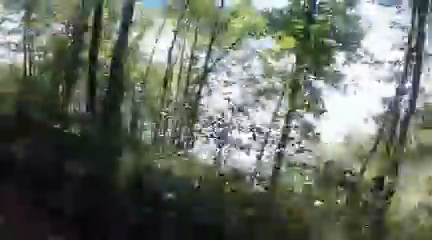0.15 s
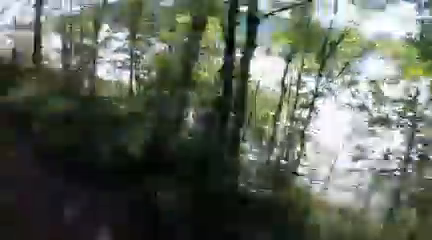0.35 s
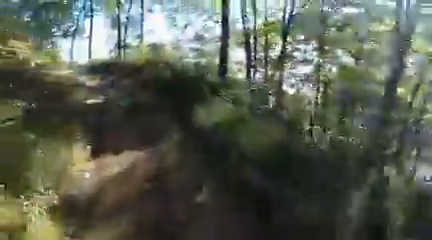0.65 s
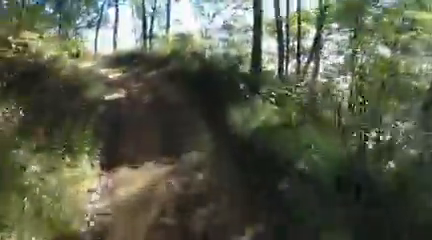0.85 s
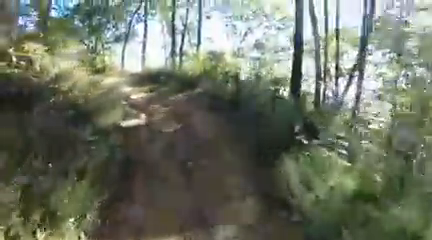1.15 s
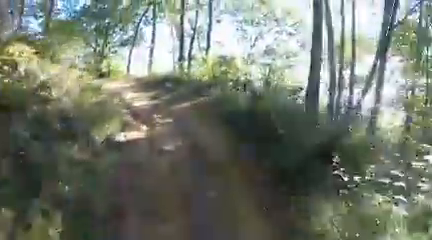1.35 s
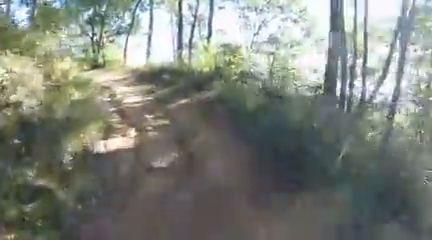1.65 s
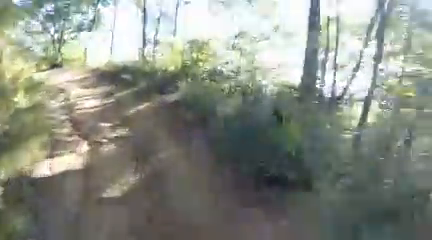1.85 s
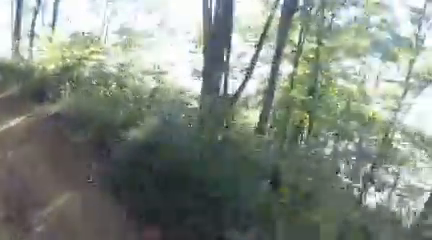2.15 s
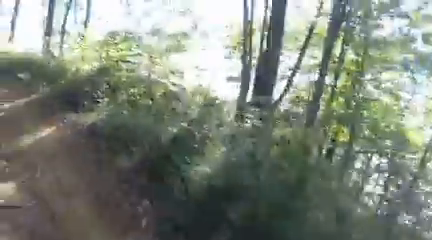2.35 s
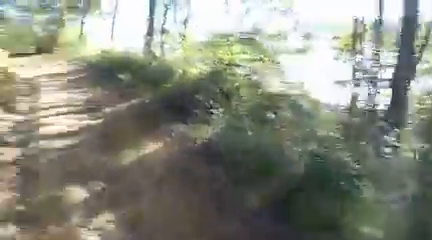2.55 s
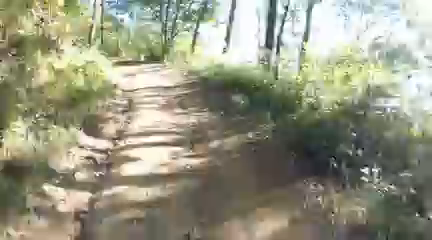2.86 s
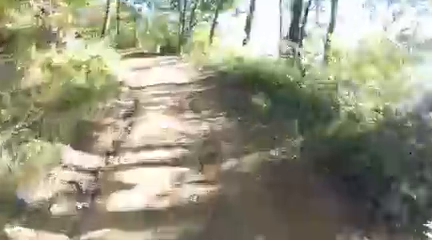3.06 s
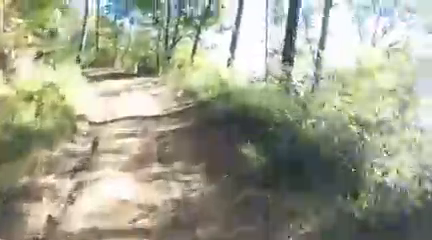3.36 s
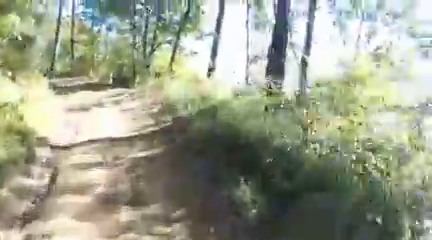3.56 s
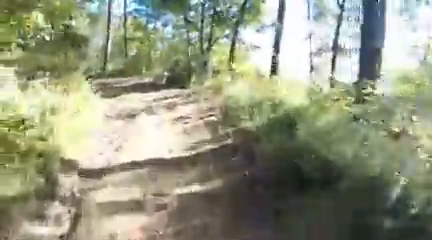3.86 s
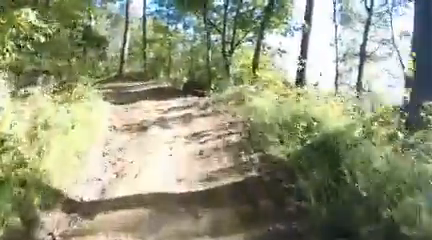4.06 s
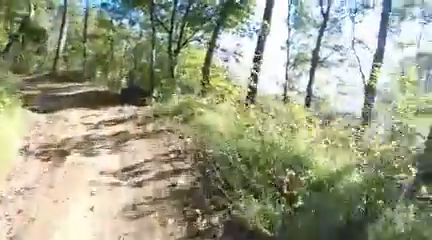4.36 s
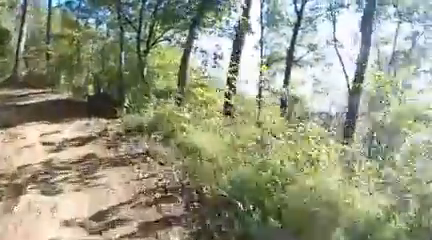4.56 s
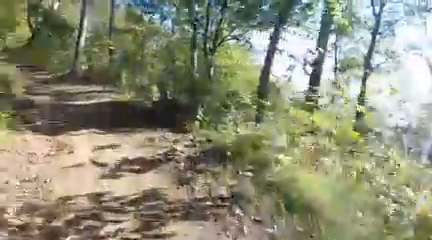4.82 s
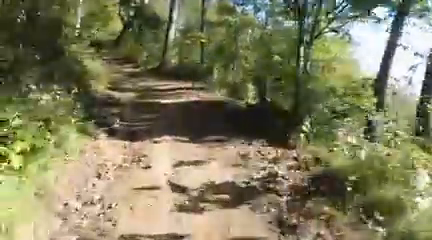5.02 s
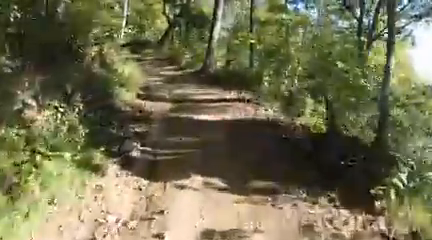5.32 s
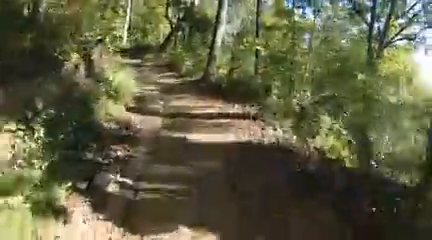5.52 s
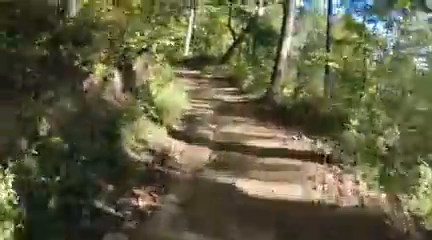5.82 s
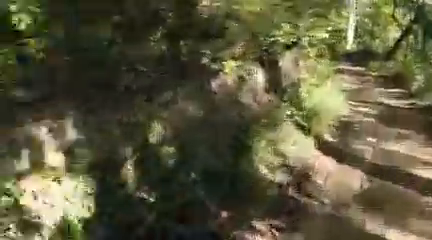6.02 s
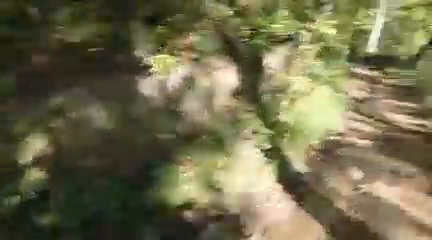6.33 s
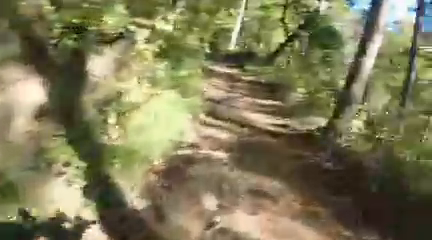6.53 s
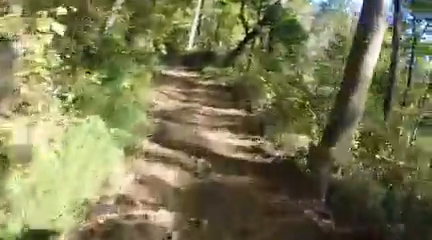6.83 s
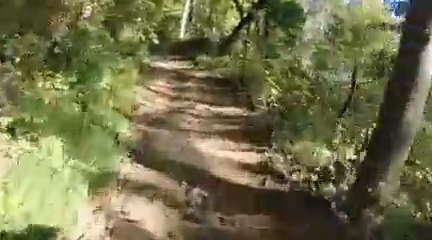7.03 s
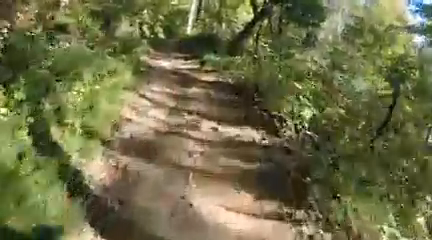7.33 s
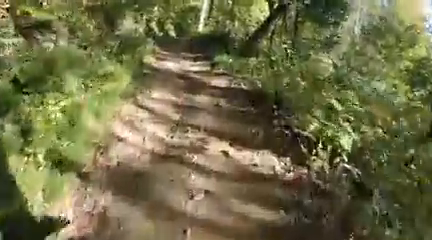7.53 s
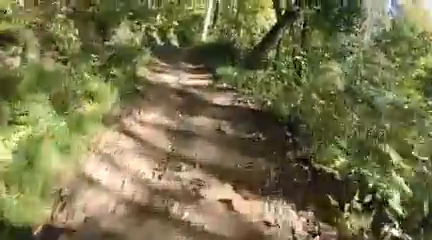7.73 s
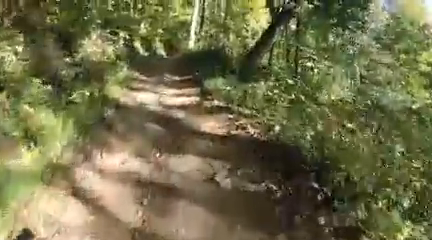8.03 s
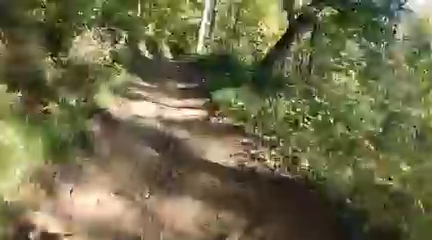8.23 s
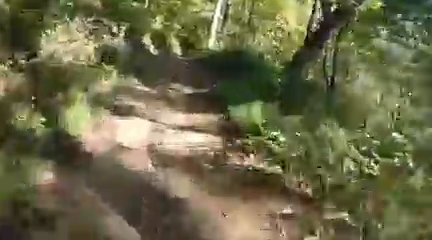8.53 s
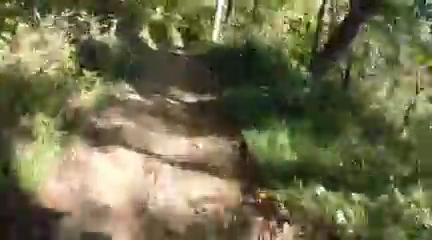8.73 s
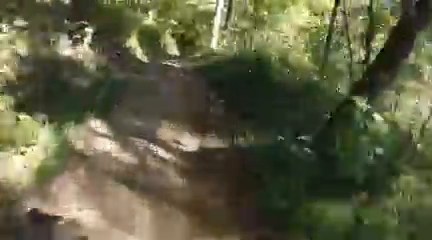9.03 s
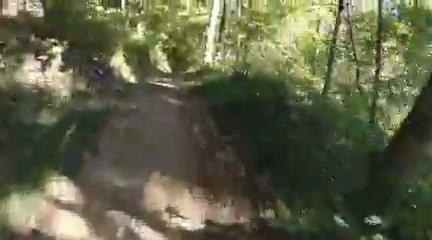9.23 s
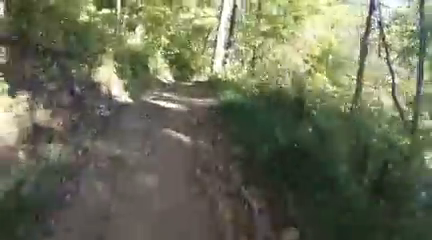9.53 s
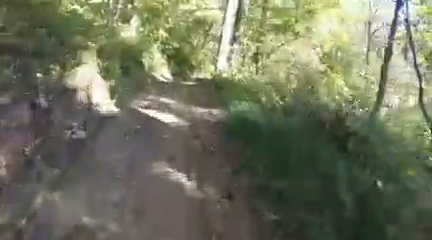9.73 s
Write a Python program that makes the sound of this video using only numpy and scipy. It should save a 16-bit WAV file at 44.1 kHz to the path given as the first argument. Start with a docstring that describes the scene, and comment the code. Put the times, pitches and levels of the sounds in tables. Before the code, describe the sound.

Heard close from the rider's seat outdoors, a single-cylinder four-stroke engine chugs at low, wavering revs with metallic rattle, chain rustle and soft hiss. A dull bump thuds at the start. The revs gradually climb, dip briefly around seven seconds, then two loud throttle bursts bring a honking intake roar and sharp knocking.

```python
"""A single-cylinder four-stroke off-roader chugs up a dirt forest trail, heard from the rider's seat.
Each engine cycle shakes the frame, clicks into resonances of silencer and pipe, and sets off cases,
valve and covers as noise through resonances. Chain and gas rustle and hiss; air and trail rumble below.
A bump thuds at the start; near the end two bursts of throttle make the airbox honk and the cylinder knock."""
import sys
import numpy as np
from scipy import signal
from scipy.fft import rfft, irfft, next_fast_len
from scipy.io import wavfile
from scipy.ndimage import uniform_filter1d

SR = 44100
rng = np.random.default_rng(int(sys.argv[2]) if len(sys.argv) > 2 else 0)


def persist_wave(psi):
    """Save psi, clipped to +-1, as 16-bit WAV."""
    counts = np.round(np.clip(psi, -1, 1) * 32767).astype(np.int16)
    wavfile.write(sys.argv[1], SR, np.atleast_2d(counts).T)


N = 435708
TIME_S = np.arange(N) / SR
CRUISE_PER_S = 22  # firings per s = engine cycles per s


def from_db(db):
    """Decibels to gain."""
    return 10 ** (np.asarray(db) / 20)


def in_time(rows):
    """Interpolate each column of a curve at every sample; the first column is time."""
    s, *columns = np.transpose(rows)
    return [np.interp(TIME_S, s, column) for column in columns]


def rms_one(x):
    """Scale to unit power."""
    return x / np.sqrt(np.mean(x ** 2) + 1e-20)


def steady(x):
    """Level to unit power over every few engine cycles."""
    power = uniform_filter1d(x ** 2, size=4400)
    power = uniform_filter1d(power, size=4400)
    return x / np.sqrt(np.abs(power) + 1e-14)


def cut(x, hz, kind, order=2):
    """Butterworth filter."""
    sos = signal.butter(order, hz, kind, fs=SR, output="sos")
    return signal.sosfilt(sos, x + 1e-18)


def colour(x, spectrum):
    """Give a noise a smooth spectrum, at unit power."""
    hz, db = np.transpose(spectrum)
    size = next_fast_len(N)
    bins_hz = np.maximum(np.fft.rfftfreq(size, 1 / SR), 1)
    gain = from_db(np.interp(np.log(bins_hz), np.log(hz), db))
    return rms_one(irfft(rfft(x, size) * gain, size)[:N])


def ring(x, modes, driven=False):
    """Parallel modes; level_db is the ring height after a click, or the resonance peak if driven."""
    out = np.zeros(N)
    for pitch_hz, width_hz, level_db in modes:
        r = np.exp(-np.pi * abs(width_hz) / SR)
        w = 2 * np.pi * pitch_hz / SR
        b = np.array([1, 0, -1]) * (1 - r * r) / 2 if driven else [0, np.sin(w)]
        out += from_db(level_db) * signal.lfilter(b, [1, -2 * r * np.cos(w), r * r], x + 1e-18)
    return out


def clicks(times_s, db):
    """One single-sample click at each time."""
    out = np.zeros(N)
    out[np.clip(np.asarray(times_s) * SR, 0, N - 1).astype(int)] = from_db(db)
    return out


def strokes(cycle, share, jitter, spread_db):
    """One slightly uneven click per engine cycle, at a given share of it."""
    turns = np.arange(int(cycle[-1] - share) + 1)
    chance = rng.standard_normal((len(turns), 2))
    times_s = np.interp(turns + share + jitter * chance[:, 0], cycle, TIME_S)
    return clicks(times_s, spread_db * chance[:, 1])


def puff(hits, decay_s):
    """A burst of turbulence of unit energy dying after each click."""
    r = np.exp(-1 / (decay_s * SR))
    envelope = signal.lfilter([np.sqrt(1 - r * r)], [1, -r], hits + 1e-18)
    return envelope * rng.standard_normal(N)


def rattling(cycle, pattern, grain_db):
    """Countless small contacts of uneven size, bunched at certain crank angles."""
    share, db = np.transpose(pattern)
    sizes = np.repeat(rng.standard_normal(N // 32 + 1), 32)[:N]
    level_db = np.interp(cycle, share, db, period=1) + grain_db * sizes
    return rng.standard_normal(N) * from_db(level_db)


# silencer modes: pitch_hz, width_hz, level_db
SILENCER_MODES = [(144, 27, 4.5), (187.5, 13.2, -3), (237, 47.6, 7), (270, 23, -8)]
# pipe modes at low revs: pitch_hz, width_hz, level_db
PIPE_MODES = [(425, 19, -6), (455, 38, 2.5), (568, 66, -4.5), (574, 65, -21)]
# pipe modes under a hard-driven gas flow: pitch_hz, width_hz, level_db
PIPE_DRIVEN_MODES = [(410, 21, 7), (465, 76, 10), (597, 19, -14)]


def exhaust(cycle, speed):
    """The power stroke thumps, then the exhaust valve lets go a sharper puff; returns boom and bark."""
    revving = np.clip((speed - 23.5) / 5, 0, 1)
    thump = strokes(cycle, share=.645, jitter=.0015, spread_db=.9)
    # blowdown comes earlier at high revs
    blowdown = strokes(cycle + .065 * revving, share=.9, jitter=.0011, spread_db=.8)
    gas = .07 * (1 - .5 * revving) * puff(thump + blowdown, decay_s=.006)
    boom = ring(thump + .29 * blowdown + gas, SILENCER_MODES)
    boom = cut(cut(boom, 182, "high"), 310.5, "low", order=8)
    putter = ring(.47 * thump - blowdown + gas, PIPE_MODES)
    putter = steady(cut(putter, 430, "high", order=6))
    blat = ring(.21 * thump - blowdown + gas, PIPE_DRIVEN_MODES)
    blat = steady(cut(blat, 440, "high", order=6))
    bark = cut((1 - revving) * putter + revving * blat, 616, "low", order=6)
    return steady(boom), steady(bark)


# airbox modes: pitch_hz, width_hz, level_db
AIRBOX_MODES = [(198, 17, -2), (237.6, 19.7, -1), (261.2, 17, 2), (291.4, 16.3, -2.5)]


def intake(cycle):
    """Each gulp of air tugs at the inlet and rings the airbox; the narrow inlet flattens peaks to a roar."""
    gulp = strokes(cycle, share=.9, jitter=.001, spread_db=.4)
    honk = ring(gulp + .02 * puff(gulp, decay_s=.008), AIRBOX_MODES)
    honk = steady(cut(honk, 178, "high", order=4))
    roar = np.tanh(1.1 * honk)
    roar = steady(cut(cut(roar, 182, "high", order=6), 303, "low", order=10))
    suction = ring(gulp, [(95, 71, 0)], driven=True)
    suction = steady(cut(suction, 135, "low", order=4))
    return roar + from_db(-17.5) * suction


# low shake, before a fixed trim: time_s, level_db
SHAKE_CURVE = [(0.0, -34.5), (1.7, -31.5), (3.93, -36.5), (5.03, -31.5), (5.06, -33.5), (6.96, -35.5),
               (7.24, -27), (7.37, -37.5), (7.92, -31.5), (8.06, -43.5), (8.17, -32), (8.97, -37),
               (9.38, -28), (9.88, -31)]


def crank(cycle):
    """The piston shakes the machine once per turn, twice per cycle."""
    shake_db = in_time(SHAKE_CURVE)[0]
    return from_db(shake_db - 1.1) * np.sqrt(2) * np.cos(4 * np.pi * (cycle - .23))


# stray knocks, click into the cylinder: time_s, level_db
STRAY_KNOCKS = [(3.8149, -28.5), (7.363, -37), (8.389, -25), (8.8273, -30)]
# sudden load, every firing knocks; click level at full effort: start_s, end_s, level_db
LOAD_SPELLS = [(8.135, 8.335, -15.5), (9.21, 9.425, -20.5)]
# cylinder struck by a knock: pitch_hz, width_hz, level_db
CYLINDER_MODES = [(866, 100, -5), (1464, 88, 6), (1660, 470, -1), (1850, 240, -8), (2700, 260, -11.5),
                  (5500, 1200, -6)]
# engine cases and fins: pitch_hz, width_hz, level_db
CASE_MODES = [(1470, 230, 3), (1506, 320, -2.5), (2315, 210, 8.5), (2460, 230, -4.5), (2650, 120, 5.5),
              (3183, 51, 2), (4380, 27, -10.5), (5070, 116, -27)]
FULL_EFFORT_DB = -17
ADVANCE_CYCLE_PER_SPEED = .007  # share of a cycle per extra firing per s


def knocks(cycle, speed, clatter_db, effort_db):
    """Combustion pings the cylinder lightly each firing, hard under sudden load; the fins buzz after it."""
    s, db = np.transpose(STRAY_KNOCKS)
    loaded = np.zeros(N)
    for start_s, end_s, level_db in LOAD_SPELLS:
        loaded += from_db(level_db) * ((TIME_S > start_s) & (TIME_S < end_s))
    advanced = cycle + ADVANCE_CYCLE_PER_SPEED * (speed - CRUISE_PER_S)
    firings = strokes(advanced, share=.705, jitter=.003, spread_db=.7)
    hard = clicks(s, db) + loaded * from_db(effort_db - FULL_EFFORT_DB) * firings
    light = from_db(clatter_db - 9) * strokes(cycle, share=.73, jitter=.014, spread_db=5)
    hits = hard + light
    pings = ring(hits + .2 * puff(hits, decay_s=.0023), CYLINDER_MODES)
    fins = from_db(-15) * ring(puff(hard, decay_s=.0047), CASE_MODES)
    return cut(cut(pings + fins, 880, "high"), 7000, "low", order=3)


# rattle over the engine cycle: cycle_share, level_db
CLATTER_PATTERN = [(0, .8), (.12, -2), (.42, -2.6), (.5, .3), (.66, -.8), (.73, 2.6), (.86, .6), (.94, 2.4)]
# hiss over the engine cycle: cycle_share, level_db
HISS_PATTERN = [(0, 6), (.15, 3), (.42, 3.3), (.46, 3.5), (.66, 5.5), (.72, 6.5), (.9, 1.4)]
# broad rustle of chain, gears and tyres: pitch_hz, density_db_per_hz (relative)
RUSTLE_SPECTRUM = [(200, -29), (350, -6), (430, 2), (620, 1), (800, -8), (1000, -4.5), (1300, 4),
                   (2000, -0.5), (3000, -4), (3800, -14), (6000, -31), (12000, -74)]
# hiss of chain and gas: pitch_hz, density_db_per_hz (relative)
HISS_SPECTRUM = [(1800, -30), (3000, -3), (4000, -2.5), (4450, 1), (4900, -5), (5500, -2), (6150, -3),
                 (7000, -13), (8050, -21.5), (8700, -18), (9600, -18), (12000, -26), (14800, -33),
                 (17000, -60)]
# stones flung against the guard, relative level: time_s, level_db
STONE_TICKS = [(0.9846, -31), (7.041, -30)]


def mechanics(cycle, clatter_db, hiss_db):
    """Valve gear and piston rattle the cases, flung stones tick on the guard; chain and gas rustle and hiss."""
    cases = rms_one(ring(rattling(cycle, CLATTER_PATTERN, grain_db=-.5), CASE_MODES, driven=True))
    rustle = colour(rattling(cycle, CLATTER_PATTERN, grain_db=1.5), RUSTLE_SPECTRUM)
    hiss = colour(rattling(cycle, HISS_PATTERN, grain_db=1.5), HISS_SPECTRUM)
    s, db = np.transpose(STONE_TICKS)
    ticks = from_db(17) * ring(puff(clicks(s, db), decay_s=.0043), CASE_MODES, driven=True)
    metal = cut(from_db(clatter_db - 3) * cases + ticks, 7070, "low", order=4)
    return metal + from_db(clatter_db + 1) * rustle + from_db(hiss_db + .15) * hiss


# cylinder head under a seating valve: pitch_hz, width_hz, level_db
HEAD_MODES = [(2330, 250, 0), (2690, 350, -6), (3260, 580, 3), (4430, 78, 6), (5660, 100, -1)]


def valves(cycle, speed, hiss_db):
    """The inlet valve snaps shut once a cycle with a short rasp, a little earlier at higher revs."""
    advanced = cycle + .016 * (speed - CRUISE_PER_S)
    snaps = strokes(advanced, share=.45, jitter=.0085, spread_db=8)
    rasp = ring(puff(snaps, decay_s=.0067), HEAD_MODES, driven=True)
    rasp = cut(rasp, [1700, 6200], "band", order=3)
    return from_db(hiss_db - 3) * steady(rasp)


# buzzing covers and guards: pitch_hz, width_hz, cruise_level_db, rise_db_per_firing_per_s,
# critical_firings_per_s, critical_change_db
COVER_MODES = [(880, 146, -65.5, 2, 18.5, 16), (1168.5, 26, -49.5, 1.1, 23.96, -15.5),
               (1458, 84, -53.5, 1.4, 24.2, 4), (1854, 57, -59.5, 0.74, 25.6, 9.5),
               (2273, 94, -55, 0.74, 21.6, 3.5), (3270, 150, -66.5, .5, 25, 11.5)]
CRITICAL_WIDTH_PER_S = 2.44


def covers(cycle, speed):
    """Thin covers buzz at their own pitch as the engine shakes them, swelling or calming near one speed."""
    shaking = rattling(cycle, CLATTER_PATTERN, grain_db=1.5)
    held = uniform_filter1d(speed, size=13000)  # they answer to sustained revs, hardly to a blip
    out = np.zeros(N)
    for pitch_hz, width_hz, cruise_db, rise_db, critical_per_s, change_db in COVER_MODES:
        near = np.exp(-((held - critical_per_s) / CRITICAL_WIDTH_PER_S) ** 2)
        level_db = cruise_db + rise_db * (held - CRUISE_PER_S) + change_db * near
        buzz = steady(ring(shaking, [(pitch_hz, width_hz, 0)], driven=True))
        out += from_db(level_db) * buzz
    return cut(out, 3460, "low", order=3)


# bumps in the trail, relative level: time_s, level_db
TRAIL_BUMPS = [(0.093, -5.5), (0.132, -17.5), (0.215, -19), (0.234, -22)]
# bodywork struck by a bump: pitch_hz, width_hz, level_db
BODYWORK_MODES = [(114, 19, 1.5), (142, 20, -15), (202, 93, -38), (370, 71, -14)]
# drumming bodywork, before a fixed trim: time_s, level_db
DRUMMING_CURVE = [(0.3, -48), (0.35, -34.5), (0.56, -50), (0.64, -39.5), (0.94, -39.5), (0.97, -44),
                  (2.41, -41), (2.46, -48), (2.7, -39.5), (3.37, -47.5), (3.85, -39), (4.3, -44.5),
                  (8.17, -42), (8.22, -37), (8.97, -43), (9.4, -33.5), (9.67, -35), (9.88, -32)]
BUFFET_CRUISE_DB, BUFFET_RISE_DB = -38, .74  # rise per extra firing per s
JOLT_DB, JOLT_S = 9.5, .36  # air swells around the bumps


def ride(revs):
    """Air buffets the microphone; the rough ground drums the bodywork and bumps make it thud."""
    s, db = np.transpose(TRAIL_BUMPS)
    jolt_db = JOLT_DB * np.exp(-np.abs(TIME_S - s.mean()) / JOLT_S)
    air_spectrum = [(3, -7), (10, -3.5), (22, -4.5), (45, -17.5), (90, -23), (300, -26.5), (2000, -100)]
    air = colour(rng.standard_normal(N), air_spectrum)
    drumming = steady(ring(rng.standard_normal(N), [(101.5, 20, 0)]))
    thuds = cut(ring(-clicks(s, db), BODYWORK_MODES), [70, 480], "band")
    buffet = from_db(BUFFET_CRUISE_DB + BUFFET_RISE_DB * revs + jolt_db) * air
    drum = from_db(in_time(DRUMMING_CURVE)[0] + 1.5) * drumming
    return buffet + drum + from_db(-4) * thuds


COAST_DB_PER_S = 9


def coast(db):
    """Chain and tyres roll on as the throttle shuts: the level rises at once and sinks slowly."""
    return np.maximum.accumulate(db + COAST_DB_PER_S * TIME_S) - COAST_DB_PER_S * TIME_S


# engine speed: time_s, firings_per_s
SPEED_CURVE = [(0.0, 19.76), (1.29, 18.38), (1.53, 16.52), (1.83, 21.61), (2.02, 18.84), (2.31, 19.73),
               (2.58, 23.35), (2.82, 20.06), (3.27, 22.48), (3.7, 21.66), (3.86, 25.35), (4.14, 24.69),
               (4.2, 23.46), (4.92, 19.46), (5.57, 22.52), (5.88, 21.16), (6.41, 25.12), (6.6, 23.63),
               (6.93, 26.55), (7.11, 15.88), (7.23, 16.16), (7.48, 25.11), (7.8, 21.47), (8.15, 24.9),
               (8.25, 30.99), (8.5, 26.59), (8.82, 27.91), (8.98, 26.76), (9.17, 27.49), (9.26, 30.75),
               (9.37, 34.12), (9.88, 29.52)]
# how hard the engine works, sets its note before a fixed trim: time_s, effort_db
EFFORT_CURVE = [(0, -44.5), (1.0, -47.5), (1.6, -47), (1.82, -43), (2.2, -42), (2.55, -40.5), (2.85, -42),
                (3.3, -39.5), (3.65, -41.5), (3.87, -38), (4.85, -43), (5.5, -41), (5.85, -41), (6.9, -37),
                (7.06, -49), (7.27, -43), (7.43, -40), (7.75, -39), (8.125, -37), (8.18, -22), (8.27, -21),
                (8.38, -33.5), (8.6, -33.5), (8.8, -32), (8.97, -34.5), (9.175, -31), (9.255, -18),
                (9.38, -16), (9.55, -22), (9.8, -26.5), (9.88, -22)]
# base levels against effort: effort_db, bark_db, clatter_db, hiss_db, airbox_share (0-1)
EFFORT_RESPONSE = [(-53.5, -65, -48.5, -56, 0), (-38, -47, -47.5, -52.5, 0.06), (-37.5, -46, -48, -51, .07),
                   (-32.5, -37, -41.5, -50.5, 0.2), (-23, -29, -40.5, -48.5, 0.85),
                   (-20, -26.5, -38.5, -48, 0.8)]
# spells of harder rattling: middle_s, half_length_s, extra_clatter_db
RATTLE_SPELLS = [(0.1, .2, 2), (4.05, 0.33, 1.5), (5.348, 0.67, 2), (7.424, 0.15, 4)]
CLATTER_RISE_DB, HISS_RISE_DB = .55, .71  # per extra firing per s


def scene():
    """The crank angle times every part of the engine; speed and effort set how loud each is."""
    speed, effort_db = in_time(SPEED_CURVE)[0], in_time(EFFORT_CURVE)[0]
    cycle = np.cumsum(speed) / SR
    revs = speed - CRUISE_PER_S
    efforts, *answers = np.transpose(EFFORT_RESPONSE)
    bark_db, clatter_db, hiss_db, share = [np.interp(effort_db, efforts, answer) for answer in answers]
    clatter_db = clatter_db + coast(CLATTER_RISE_DB * revs)
    hiss_db = hiss_db + coast(HISS_RISE_DB * revs)
    for middle_s, half_s, extra_db in RATTLE_SPELLS:
        clatter_db = clatter_db + extra_db * np.exp(-((TIME_S - middle_s) / half_s) ** 2)
    throttle = np.clip(share, 0, 1)
    boom, bark = exhaust(cycle, speed)
    # with the throttle open the airbox takes over from the silencer
    note = steady(throttle * intake(cycle) + (1 - throttle) * boom)
    engine = from_db(effort_db + .68) * note + from_db(bark_db - .9) * bark + crank(cycle)
    metal = knocks(cycle, speed, clatter_db, effort_db) + mechanics(cycle, clatter_db, hiss_db)
    metal += valves(cycle, speed, hiss_db) + covers(cycle, speed)
    return (engine + metal + ride(revs))[None]


CUTOFF_HZ = 14800


def record(dry):
    """A steep elliptic low-pass cuts the top."""
    sos = signal.ellip(10, .1, 80, CUTOFF_HZ, fs=SR, output="sos")
    return signal.sosfilt(sos, dry)


dry = scene()
out = record(dry)
persist_wave(out)
```